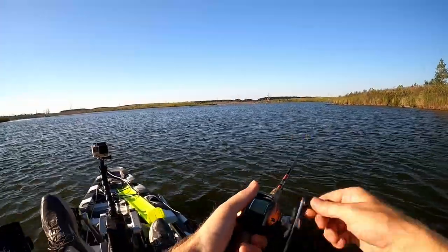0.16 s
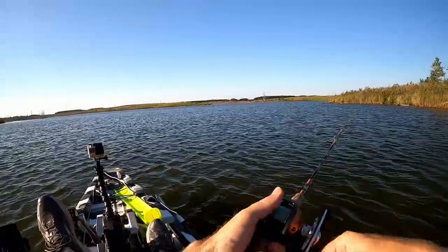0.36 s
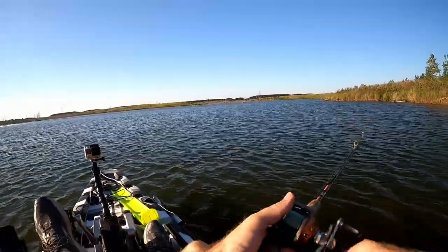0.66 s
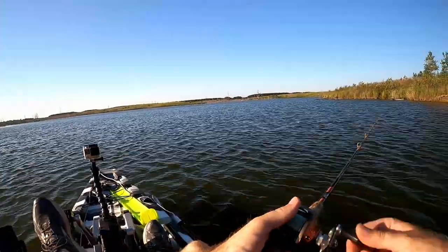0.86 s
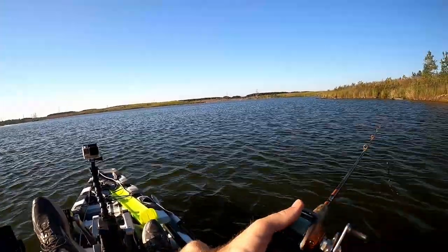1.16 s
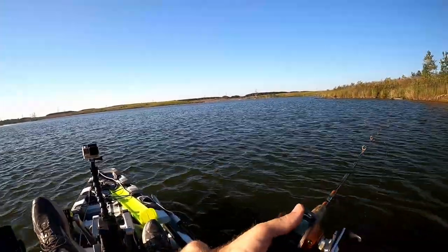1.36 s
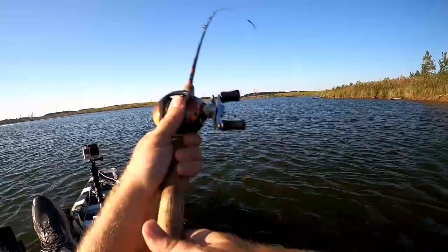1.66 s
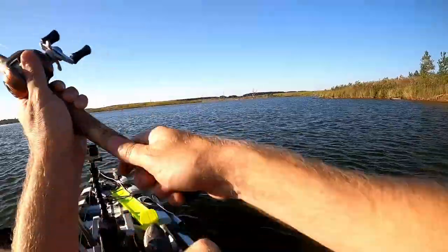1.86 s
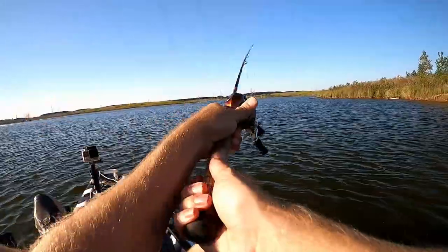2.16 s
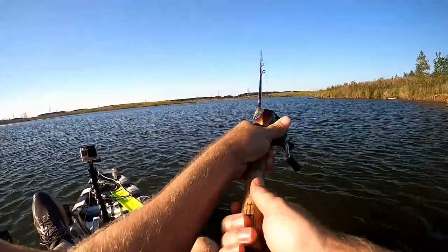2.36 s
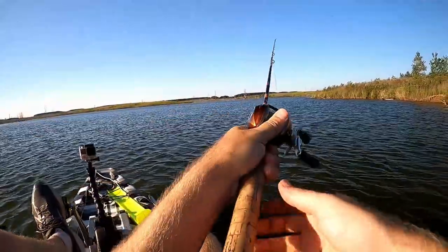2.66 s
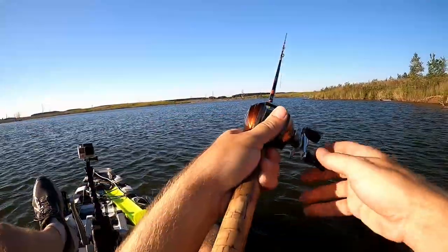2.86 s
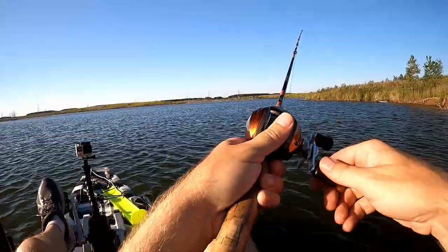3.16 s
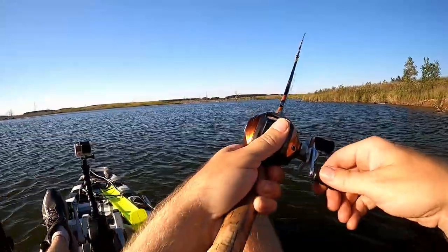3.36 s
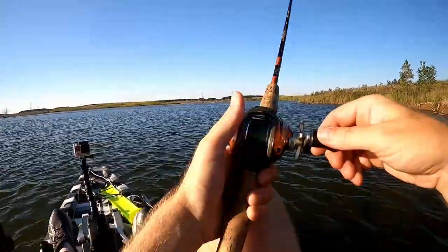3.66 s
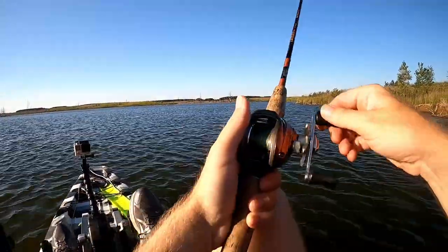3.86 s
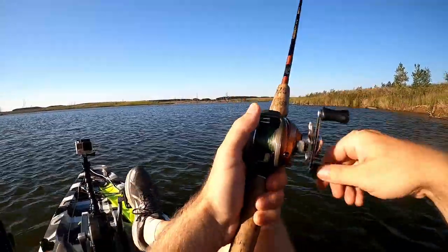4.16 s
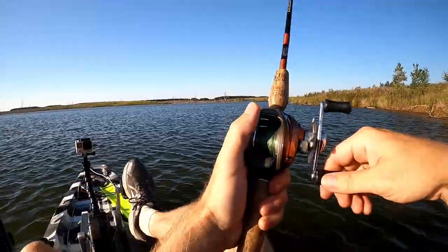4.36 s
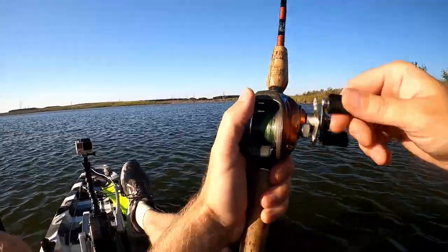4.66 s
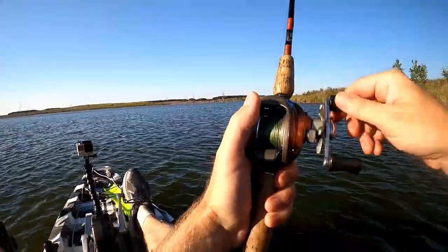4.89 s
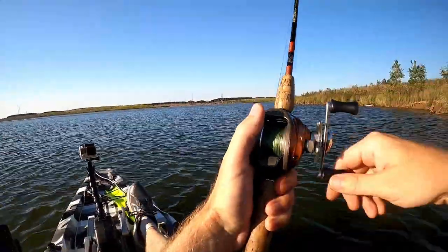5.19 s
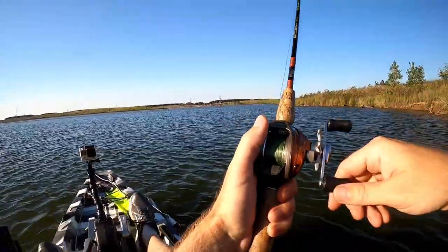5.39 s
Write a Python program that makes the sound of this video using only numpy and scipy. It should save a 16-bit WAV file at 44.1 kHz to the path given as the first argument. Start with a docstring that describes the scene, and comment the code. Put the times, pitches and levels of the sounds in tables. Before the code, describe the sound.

Irregular watery knocks and gulps ring under a small hull, with drips and tiny ticks. About a quarter through comes a crisp reel click, then a short airy whip and a whirring spool that slows. A strong wave slap and a cluster of metallic clacks follow, then sparse gear clicks and lapping. Outdoors, dry and close, light wind buffets the microphone over a thin insect shimmer from shore.

```python
"""Wavelets on a kayak, angler casting

Close by, small waves slap a plastic hull: each traps an air pocket that rings and climbs, and knocks the hull.
Wind rumbles on the microphone and a far chorus of insects sings on the shore, as noise shaped in pitch and level.
An angler presses the reel's clutch (noise bursts through resonances), whips the rod (an upward sweep of noise),
lets the spool run and cranks (whirr, hiss and hum). One microphone port rings near the top of the band.
"""
import sys
import numpy as np
from scipy import signal
from scipy.fft import rfft, irfft, next_fast_len
from scipy.io import wavfile
from scipy.ndimage import uniform_filter1d, map_coordinates

SR = 44100
rng = np.random.default_rng(int(sys.argv[2]) if len(sys.argv) > 2 else 0)


def to_wav(sig):
    """Store sig (one row per channel, or 1-D mono) as 16-bit WAV at the path in sys.argv[1].

    Samples outside -1..1 are clipped; the rate is SR.
    """
    pcm = np.clip(np.atleast_2d(sig), -1, 1) * 32767
    pcm = np.round(pcm).astype(np.int16)
    wavfile.write(sys.argv[1], SR, pcm.T)  # frames by channels


N = 243873  # samples

# Wind at the microphone: [t/s, slow heave level/dB, flutter level/dB]
WIND_LEVELS = [(0.0, -37.5, -46), (0.31, -49, -46.5), (1.02, -39, -44.5), (1.45, -52, -49),
               (1.51, -42.5, -44.5), (2.05, -41.5, -44), (2.22, -40, -42), (2.54, -55, -50.5),
               (2.6, -47, -49.5), (2.88, -53, -47), (3.11, -37, -48), (3.26, -39.5, -40.5),
               (3.48, -34.5, -40.5), (4.11, -44.5, -48.5), (4.68, -42, -45.5), (5.05, -45, -49),
               (5.5, -35.5, -43.5), (5.53, -60, -44)]
# Spectrum of the slow heave: [f/Hz, relative level/dB per Hz]
HEAVE_SPECTRUM = [(8, -25), (18, 1), (32, -1), (55, -2), (90, -30)]
# Spectrum of the flutter: [f/Hz, relative level/dB]
FLUTTER_SPECTRUM = [(35, -26.5), (60, -1.5), (85, 4.5), (110, -0.5), (155, -0.5), (200, -5.5), (270, -11.5),
                    (400, -21.5)]

# Spectrum of the far insect chorus: [f/Hz, relative level/dB]
CHORUS_SPECTRUM = [(1710, -65), (2900, -12.5), (2980, -11.5), (3280, -27), (3410, -9), (3540, -2.5),
                   (3790, -5.5), (3970, 4), (4570, -3.5), (4850, -1.5), (5850, -9.5), (6400, -20),
                   (8320, -41.5), (14100, -120)]
# Spectrum of the upper insects: [f/Hz, relative level/dB]
UPPER_SPECTRUM = [(5000, -19), (5700, -5.5), (6300, -10.5), (6800, -18.5), (7400, -31.5), (8500, -41.5)]
# Swells of the upper insects, about three a second: [crest t/s, level/dB]
UPPER_SWELLS = [(.28, -66), (.61, -66.5), (1.04, -68), (1.52, -68), (1.9, -61.5), (2.2, -61), (2.6, -79),
                (3.13, -63), (3.4, -58.5), (3.8, -70), (4.1, -67), (4.52, -80), (4.83, -66), (5.27, -64)]
CHORUS_DB, CHORUS_DRIFT_DB, UPPER_REST_DB, SWELL_HALF_S = -54, 0.76, -94.5, 0.084

# Rod tip cutting the air: [t/s, band centre f/Hz, level/dB, band width as a share of the centre]
TIP_SWEEP = [(2.165, 2200, -68, .4), (2.183, 2500, -33.5, 0.25), (2.192, 3030, -35.5, 0.44),
             (2.201, 5130, -45, 0.2), (2.212, 6900, -54, .2), (2.225, 10400, -67.5, 0.33),
             (2.25, 12500, -75, .3), (2.29, 11000, -79, 0.32)]
# Spectrum of the air pushed by the whole rod: [f/Hz, relative level/dB per Hz]
SWING_SPECTRUM = [(300, -25), (600, -9), (1100, 4), (1800, 0), (2800, -18), (4500, -30)]
SWING_S, SWING_HALF_S, SWING_DB = 2.103, 0.087, -46.5

# Reel clicks: [t/s, level/dB, treble level/dB re level, puff t60/s, frame tilt/dB per octave,
# side plate tilt/dB per octave]
REEL_CLICKS = [(0.0564, -47, -7.5, 0.013, -9, 3), (0.963, -42.5, -15, 0.016, 5, 0),
               (1.563, -48.5, -11, .011, -4, -1), (1.5837, -29.5, -20, 0.014, -4, -2),
               (1.5888, -20.5, -14, 0.023, 6, 15), (2.7026, -44, -22, .012, 17, -1.5),
               (3.4341, -24.5, -26, 0.0044, -30, -6), (3.6996, -32, -30, 0.013, -28, -3),
               (3.7124, -28, -15, 0.012, 10, 2), (3.7156, -48, -10, 0.022, 27, -4),
               (3.7187, -23.5, -21, 0.025, 14, 8), (3.7244, -16.5, -22.5, 0.026, 3, -8),
               (3.7274, -35, -23, 0.083, -34, 3), (3.7636, -38.5, -20, .014, 15, 6),
               (4.483, -39, -13, 0.01, 1, 6), (4.5075, -31, -16, 0.029, 10, -9),
               (4.9874, -53, -6, .0066, -5, -4), (5.0233, -24, -16.5, 0.027, 13, -20)]
# Resonances of the reel frame: [f/Hz, width/Hz, level/dB]
FRAME_MODES = [(1323, 570, -11), (2134, 2000, 3), (3020, 2450, -1), (5730, 610, -14)]
# Resonances of the reel side plates: [f/Hz, width/Hz, level/dB]
PLATE_MODES = [(7950, 560, -26), (9130, 1700, 9.5), (12840, 1400, 0), (15140, 1600, 0)]
# Line moving through reel and guides: [t/s, level/dB]
LINE_LEVELS = [(0, -70.5), (.15, -64), (.3, -56), (.6, -57), (1.3, -65.5), (1.7, -62), (2.03, -57),
               (2.07, -47.5), (2.18, -43), (2.24, -42), (2.3, -44.5), (2.55, -51), (2.77, -47.5),
               (2.95, -51), (3.2, -51), (3.4, -53), (3.54, -53), (3.6, -57.5), (4, -60.5), (4.24, -67),
               (4.56, -68), (4.85, -61.5), (5.3, -67.5), (5.53, -66)]
# Spectrum of fast line, a whirr: [f/Hz, relative level/dB]
WHIRR_SPECTRUM = [(470, -6), (700, 2.5), (1040, -2.5), (1520, 0), (1800, 5), (2240, 3.5), (3530, -3.5),
                  (4140, -4), (5380, -6.5), (6000, -23.5), (7800, -50), (13200, -120)]
# Spectrum of slow line, a rustle: [f/Hz, relative level/dB]
SLOW_LINE_SPECTRUM = [(600, -27), (950, -9), (1100, -4.5), (1240, -3), (1500, -3), (1940, -1), (2450, -1.5),
                      (2900, -6), (3400, -1), (4400, -7)]
# Spectrum of the fine treble hiss: [f/Hz, relative level/dB]
FINE_SPECTRUM = [(4000, -29.5), (6500, 8), (8000, 0.5), (9400, 4.5), (11300, -0.5), (12500, -2.5),
                 (14000, -5), (16000, -10)]
# Swells of hiss and rustle, mostly brief, some around reel clicks:
# [crest t/s, half length/s, body level/dB, fine hiss level/dB]
HISS_AND_RUSTLE_SWELLS = [(1.589, .02, -78, -59.5), (1.794, .03, -64, -68), (1.909, 0.045, -61, -63.5),
                          (2.225, 0.056, -71, -69.5), (2.44, 0.11, -57.5, -80), (3.728, 0.03, -52.5, -63),
                          (4.512, 0.025, -53.5, -72), (4.9, 0.33, -76.5, -90)]
# Hum of the free spool as it slows: [t/s, f/Hz, level/dB]
SPOOL_HUM = [(2.24, 740, -77), (2.29, 678, -51), (2.38, 616, -49.5), (2.45, 598, -55.5), (2.52, 556, -51),
             (2.6, 560, -72.5)]
SPOOL_FREE_S, SPOOL_STOP_S, SPIN_UP_S, BRAKE_S = 2.05, 3.565, 0.02, 0.015  # the free run
# fine hiss while running, its early fade and that fade's length, then the hiss at rest
SPIN_HISS_DB, SPIN_FADE_DB_PER_S, FADE_S, REST_HISS_DB = -69, 12.5, 0.42, -80

# Wave slaps: [t/s, air pocket level/dB, pocket f/Hz, pocket t60/s, hull knock level/dB re pocket,
# splash level/dB re pocket]
WAVE_SLAPS = [(.047, -46, 309, 0.089, -19, -11), (.139, -38.5, 273, 0.079, -5.5, -15),
              (.172, -34.5, 475, .11, -33, -33), (.431, -52, 545, .18, -15, -9),
              (.525, -31, 535, .08, -1, -29), (.643, -43.5, 556, .054, -24, -10),
              (.939, -48.5, 502, .16, -3, 5), (.965, -18, 490.5, 0.12, -2, -23.5),
              (.981, -25.5, 479, 0.098, -5.5, -18.5), (1.452, -25, 456, .16, -2.5, -7.5),
              (1.725, -16.5, 366, 0.094, -4.5, -48), (1.739, -25.5, 417, 0.12, 2.5, -15.5),
              (1.88, -32.5, 298, 0.056, 4, -5), (1.905, -24.5, 307, 0.055, -29, -20),
              (2.001, -32.5, 388, 0.096, -2.5, -10.5), (2.953, -33.5, 397, 0.054, -11.3, -8),
              (3.432, -14.5, 418, 0.065, -2.5, -43), (3.443, -22, 468.5, .16, -1, -19),
              (3.693, -5.5, 351, 0.068, -7.5, -49), (3.711, -15.5, 394, 0.15, -19, -25),
              (4.117, -28, 439, 0.13, -5, -11), (4.486, -23, 320, 0.09, -7, -14),
              (4.514, -31, 484, 0.1, 4, -17), (4.818, -29.5, 264, 0.073, -10.5, -11.5),
              (5.026, -27.5, 360.3, 0.17, 2, -14), (5.249, -26.5, 429, 0.22, -0.5, -42),
              (5.332, -28, 398, 0.14, -2, -22)]
# Dull gulps under the hull: [crest t/s, level/dB, f/Hz, half length/s]
HULL_GULPS = [(.185, -36, 151, 0.019), (1.009, -33.5, 400, 0.043), (1.029, -23.5, 320, 0.0065),
              (1.045, -18, 274, 0.0069), (1.07, -32.5, 173, 0.026), (1.095, -34, 90.6, 0.027),
              (1.121, -46.5, 239, 0.027), (1.962, -29.5, 84.5, 0.017), (2.154, -31.5, 289, 0.01),
              (2.167, -21.5, 245, 0.004), (2.791, -26, 243, 0.006), (2.829, -30, 140, .02),
              (2.835, -34, 262.4, 0.02), (3.27, -29, 347, 0.0095), (3.493, -32, 51, 0.019),
              (3.737, -22, 187, 0.0036), (4.537, -55, 400, 0.0038), (5.037, -33, 374, 0.0031)]
# Small bubbles and drips, and nearly steady hull rings (rise .3) that mostly come with slaps:
# [t/s, level/dB, starting f/Hz, pitch rise/share of the start per s]
DRIPS_AND_HULL_RINGS = [(.135, -43, 1300, 6.5), (.964, -32, 1525, 1.2), (1.34, -47, 1520, .3),
                        (1.452, -27, 1427, .3), (1.543, -38, 2540, 5), (1.739, -33, 1340, .3),
                        (2.211, -26.5, 1430, 1.5), (2.251, -28.5, 1330, 1.3), (2.546, -32, 2500, 3.8),
                        (3.431, -26, 1356, .3), (3.678, -38, 2270, 6.1), (3.692, -26.5, 1330, .3),
                        (3.696, -27, 690, 25), (3.766, -33.5, 1490, 3.6), (3.804, -40, 2080, 5),
                        (3.879, -38, 2250, 5), (3.932, -29, 2140, 5.1), (4.117, -34, 866, 29),
                        (4.143, -37, 1545, 7.7), (4.512, -33, 1455, .3), (4.526, -36, 1390, .3),
                        (5.026, -27.5, 1393, .3), (5.193, -43, 2000, 5), (5.281, -43, 1200, 23),
                        (5.386, -39, 1805, .3)]
# Small dry ticks of water on the hull: [t/s, level/dB, tilt/dB per octave]
WATER_TICKS = [(0.134, -46, 11), (.36, -46, -6), (.431, -61, -3), (0.511, -51, -3), (.644, -45, -6),
               (.673, -47, -19), (1.272, -55, -1), (2.782, -37.5, -3), (2.954, -50, 0), (3.879, -49, -3),
               (3.933, -38, 7), (4.014, -37, -23), (4.072, -34, -25), (4.142, -36, 0), (4.188, -46.5, 7),
               (4.619, -43, -9), (4.638, -41.5, 6), (4.666, -48, -6), (4.715, -44, -12), (4.749, -45, -5),
               (4.818, -38, 10), (4.86, -49, -3), (4.892, -37, -2), (4.913, -43, -8), (4.978, -48, 3),
               (5.13, -40.5, -16)]
# Ripples murmuring on the hull: [t/s, level/dB]
LAP_LEVELS = [(0.0, -55), (0.15, -66.5), (0.54, -51.5), (0.69, -64.5), (0.91, -65), (1.06, -52.5),
              (1.48, -67), (1.8, -48), (1.92, -48.5), (2.09, -42), (2.26, -46.5), (2.51, -55), (2.74, -54),
              (3.45, -43), (3.65, -44.5), (4.45, -48.5), (4.79, -43), (5.53, -55)]
# Spectrum of that murmur: [f/Hz, relative level/dB]
LAP_SPECTRUM = [(110, -36), (180, -1.5), (260, -6.5), (340, -8.5), (430, -10), (495, -5), (560, -14.5),
                (700, -15.5), (800, -21), (1100, -31.5), (1500, -29)]
# Resonances of the plastic hull: [f/Hz, width/Hz, level/dB]
HULL_MODES = [(142.7, 35, -6.5), (264.4, 32.4, -9.5), (331.6, 27.5, -2.5), (465.7, 80, 2.5), (575, 88, -4),
              (727, 37, -15), (914, 92, -16), (1255, 630, 5.5)]
POCKET_RISE = 2.79  # share of the starting pitch per s
WASH_DB = -10  # wash, relative to the air pocket
RING_CYCLES = 48  # cycles until a drip or hull ring has fallen by 60 dB

# Right microphone port, the frequency where it takes over, and the top of the band
PORT_HZ, PORT_WIDTH_HZ, PORT_DB, SPLIT_HZ, TOP_HZ = 12670, 1800, 14.5, 11930, 15800


def amp(db):
    """Decibels to amplitude."""
    return 10 ** (np.asarray(db) / 20)


def unit(x):
    """Scale to an rms of 1."""
    return x / np.sqrt(np.mean(x ** 2) + 1e-20)


def curves(rows):
    """One value per sample for each column after the time."""
    s, *columns = np.transpose(rows)
    return [np.interp(np.arange(N) / SR, s, column) for column in columns]


def wobble(rate):
    """A smooth random curve, rate knots a second."""
    knots = rng.standard_normal(int(N * rate / SR) + 4)
    return map_coordinates(knots, [np.arange(N) * rate / SR])


def swell(s, half, db):
    """A bell-shaped rise and fall of level around time s."""
    return amp(db) * np.exp(-((np.arange(N) / SR - s) / half) ** 2)


def filtered(x, response):
    """x times a complex response of frequency."""
    m = next_fast_len(x.shape[-1] + 8192)
    spectrum = rfft(x, m) * response(np.fft.rfftfreq(m, 1 / SR))
    return irfft(spectrum, m)[..., :x.shape[-1]]


def body(modes):
    """Causal response of a set of resonances, added with alternating sign."""
    def mode(f, k, centre, width, db):
        damping = 1j * f * width
        return (-1) ** k * amp(db) * damping / (centre * centre - f * f + damping)
    return lambda f: sum(mode(f, k, *row) for k, row in enumerate(modes))


def rush(spectrum, patchy_db):
    """Coloured noise of rms 1 with patches of random gain."""
    z = signal.stft(rng.standard_normal(N), nperseg=512)[2]
    field = uniform_filter1d(rng.standard_normal(z.shape), size=5, axis=0)  # across frequency
    field = uniform_filter1d(field, size=10, axis=1)  # along time
    noise = signal.istft(z * amp(patchy_db * unit(field)), nperseg=512)[1][:N]
    hz, db = np.transpose(spectrum)
    return unit(filtered(noise, lambda f: amp(np.interp(np.log(f + 1), np.log(hz), db, -120, -120))))


def add(out, s, sound):
    """Mix a sound in from time s."""
    out[round(s * SR):][:len(sound)] += sound


def burst(modes, t60, attack, top_hz, tilt_db=0):
    """A dying puff of noise through resonances, peak 1; every blow stirs the modes at new strengths."""
    t = np.arange(SR // 4) / SR
    puff = amp(-60 * t / t60) * (1 - np.exp(-t / attack)) * rng.standard_normal(len(t))
    # the tilt pivots at 2200 Hz
    stirred = body([(c, w, db + rng.normal(0, 2.3) + tilt_db * np.log2(c / 2200)) for c, w, db in modes])
    ring = filtered(puff, lambda f: stirred(f) / (1 + 1j * f / top_hz) ** 3)  # a soft contact holds no treble
    return ring / np.abs(ring).max()


def wind():
    """Turbulence heaves slowly and flutters in lumps on the microphone."""
    heave_db, flutter_db = curves(WIND_LEVELS)
    heave = unit(amp(1.0 * wobble(6)) * rush(HEAVE_SPECTRUM, patchy_db=1.2))
    flutter = unit(amp(0.93 * wobble(12)) * rush(FLUTTER_SPECTRUM, patchy_db=-0.5))
    return amp(heave_db) * heave + amp(flutter_db) * flutter


def insects():
    """A far, smooth chorus of shaped noise; the upper singers swell on their own."""
    chorus_level = amp(CHORUS_DB + CHORUS_DRIFT_DB * wobble(6.18) + 0.3 * wobble(40))
    chorus = chorus_level * rush(CHORUS_SPECTRUM, patchy_db=-0.03)
    upper_level = amp(UPPER_REST_DB) + sum(swell(s, SWELL_HALF_S, db) for s, db in UPPER_SWELLS)
    return chorus + upper_level * rush(UPPER_SPECTRUM, patchy_db=4.0)


def rod_swing():
    """The whole rod pushes air before the tip cracks forward: one swell of noise."""
    return swell(SWING_S, SWING_HALF_S, SWING_DB) * rush(SWING_SPECTRUM, patchy_db=3.5)


def rod_tip():
    """The tip speeds up, so its swish is a ragged band of noise sweeping upward."""
    f, t, z = signal.stft(rng.standard_normal(N), SR, nperseg=256)
    s, hz, db, width = np.transpose(TIP_SWEEP)
    distance = np.log((f[:, None] + 1) / np.interp(t, s, hz))
    band = np.exp(-(distance / np.interp(t, s, width)) ** 2)
    band /= np.sqrt(np.mean(band ** 2, axis=0))
    level = amp(np.interp(t, s, db, -200, -200))
    swish = signal.istft(z * band * level, SR, nperseg=256)[1][:N]
    return swish * amp(2.5 * wobble(150))


def reel_clicks():
    """Clutch and gears strike frame and side plates; each port hears its own fine treble."""
    out = np.zeros((2, N + SR))
    for s, db, treble_db, t60, frame_tilt, plate_tilt in REEL_CLICKS:
        low = amp(db) * burst(FRAME_MODES, t60, attack=0.00014, top_hz=6540, tilt_db=frame_tilt)
        high, other = (amp(db + treble_db) * burst(PLATE_MODES, t60, attack=0.00031, top_hz=30000,
                                                   tilt_db=plate_tilt) for _ in range(2))
        add(out[0], s - .0008, low + high)
        add(out[1], s - .0008, low + 1.2 * high + .6 * other)
    return out[:, :N]


def spool_hum():
    """The free spool hums at a wavering pitch that falls as it slows."""
    hum_hz, hum_db = curves(SPOOL_HUM)
    phase = 2 * np.pi * np.cumsum(hum_hz * (1 + 0.031 * wobble(50))) / SR
    audible = hum_db > -69  # silent outside the run
    return amp(hum_db + 7.4 * wobble(42)) * audible * np.sin(phase)


def line_and_spool():
    """Line whirrs or rustles through reel and guides, under a fine hiss that differs at each port."""
    line_db, = curves(LINE_LEVELS)
    t = np.arange(N) / SR
    started = 1 + np.tanh((t - SPOOL_FREE_S) / SPIN_UP_S)
    unbraked = 1 + np.tanh((SPOOL_STOP_S - t) / BRAKE_S)
    fade_db = SPIN_FADE_DB_PER_S * np.clip(t - SPOOL_FREE_S, 0, FADE_S)
    spin = started * unbraked / 4 * amp(SPIN_HISS_DB - fade_db)
    loud = amp(line_db) + sum(swell(s, half, db) for s, half, db, _ in HISS_AND_RUSTLE_SWELLS)
    hiss = amp(REST_HISS_DB) + spin + sum(swell(s, half, db) for s, half, _, db in HISS_AND_RUSTLE_SWELLS)
    rattle_db = 1.37 * wobble(60)  # the spool shakes in its bearings
    # only fast line whirrs; slow line just rustles
    fast = np.clip((20 * np.log10(loud) + 57) / 9, 0, 1)
    whirr = np.sqrt(fast) * rush(WHIRR_SPECTRUM, patchy_db=0.9)
    rustle = np.sqrt(1 - fast) * rush(SLOW_LINE_SPECTRUM, patchy_db=2.0)
    fine = np.array([rush(FINE_SPECTRUM, patchy_db=1.2) for _ in range(2)])
    return loud * amp(rattle_db) * (whirr + rustle) + hiss * amp(0.35 * rattle_db) * fine


def rising_ring(hz, t60, rise, attack, rough_db=0):
    """A dying tone climbs, as an air pocket does when it nears the surface; its level shakes unevenly."""
    t = np.arange(SR // 4) / SR
    shake = map_coordinates(rng.standard_normal(24), [t * 70])
    level = amp(-60 * t / t60 + rough_db * shake) * (1 - np.exp(-t / attack))
    return level * np.sin(2 * np.pi * hz * (t + rise * t * t / 2))


def knock():
    """A sudden soft push rings the hull modes, peak 1."""
    t = np.arange(SR // 4) / SR
    ring = sum(amp(db + 2 * rng.standard_normal()) * np.exp(-np.pi * w * t) * np.sin(2 * np.pi * c * t)
               for c, w, db in HULL_MODES[:7])
    ring *= 1 - np.exp(-(t / 0.0027) ** 2)
    return ring / np.abs(ring).max()


def slaps(out):
    """Each wave traps a ringing air pocket, knocks the hull, and leaves a noisy wash and splash."""
    splash_modes = HULL_MODES[5:] + FRAME_MODES[1:2]
    for s, db, hz, t60, knock_db, splash_db in WAVE_SLAPS:
        pocket = rising_ring(hz, t60, POCKET_RISE, attack=0.0017, rough_db=4.0)
        wash = burst(HULL_MODES[3:7], t60=0.13, attack=0.0012, top_hz=1180)
        splash = burst(splash_modes, t60=0.04, attack=0.0005, top_hz=3000)
        add(out, s - .0003, amp(db) * pocket)
        add(out, s - .0003, amp(db + knock_db) * knock())
        add(out, s, amp(db + WASH_DB) * wash)
        add(out, s - .0006, amp(db + splash_db) * splash)


def gulps(out):
    """Dull tones under the hull swell and fade symmetrically."""
    for s, db, hz, half in HULL_GULPS:
        t = np.arange(-3 * half, 3 * half, 1 / SR)
        tone = np.cos(2 * np.pi * hz * t + 2 * np.pi * rng.random())
        add(out, s - 3 * half, amp(db) * np.exp(-(t / half) ** 2) * tone)


def drips_and_hull_rings(out):
    """Drips rise in pitch; hull rings hold almost steady."""
    for s, db, hz, rise in DRIPS_AND_HULL_RINGS:
        ring = rising_ring(hz, RING_CYCLES / hz, rise, attack=0.0025, rough_db=1.8)
        add(out, s - .002, amp(db) * ring)


def ticks(out):
    """Small dry ticks of water on the hull are short noise bursts through resonances."""
    tick_modes = HULL_MODES[3:] + FRAME_MODES[1:3]
    for s, db, tilt_db in WATER_TICKS:
        tick = burst(tick_modes, t60=0.01, attack=0.00039, top_hz=3460, tilt_db=tilt_db)
        add(out, s - .0006, amp(db) * tick)


def ripples(out):
    """Faint rising rings at random times, mostly small, over a lumpy murmur against the hull."""
    lap_db, = curves(LAP_LEVELS)
    for place, pitch, size in rng.random((90, 3)):
        i = int(place * (N - 1))
        level_db = lap_db[i] - 8 - 2.1 * np.log(size)
        add(out, i / SR, amp(level_db) * rising_ring(330 * 2.2 ** pitch, 0.057, rise=3.7, attack=0.004))
    lumps = amp(2.4 * wobble(22))
    out[:N] += amp(lap_db) * lumps * rush(LAP_SPECTRUM, patchy_db=4.5)


def waves():
    """Ripples, drips, hull rings, ticks, gulps and slaps of water against the hull."""
    out = np.zeros(N + SR)
    ripples(out)
    drips_and_hull_rings(out)
    ticks(out)
    gulps(out)
    slaps(out)
    return out[:N]


def scene():
    """Sum the sources at the two microphone ports; only the reel differs between them."""
    reel = reel_clicks() + spool_hum() + line_and_spool()
    return wind() + insects() + rod_swing() + rod_tip() + reel + waves()


def record(dry):
    """Below the split both sides carry mostly the left port; above it the right port comes in with its ring."""
    def top(f):
        return 1 / (1 + np.exp((SPLIT_HZ - f) / 120))

    def leak(f):  # some right port already below the split
        return (1 - top(f)) * 0.29 / (1 + np.exp((6800 - f) / 900))

    def ring(f):
        return amp(PORT_DB) * PORT_HZ * PORT_WIDTH_HZ / (PORT_HZ ** 2 - f * f + 1j * f * PORT_WIDTH_HZ)

    from_left = filtered(dry[0], lambda f: 1 - top(f) - leak(f))
    from_right = filtered(dry[1], lambda f: top(f) * ring(f) + leak(f))
    return filtered(np.array([dry[0], from_left + from_right]), lambda f: f < TOP_HZ)


dry = scene()
out = record(dry)
to_wav(out)
```